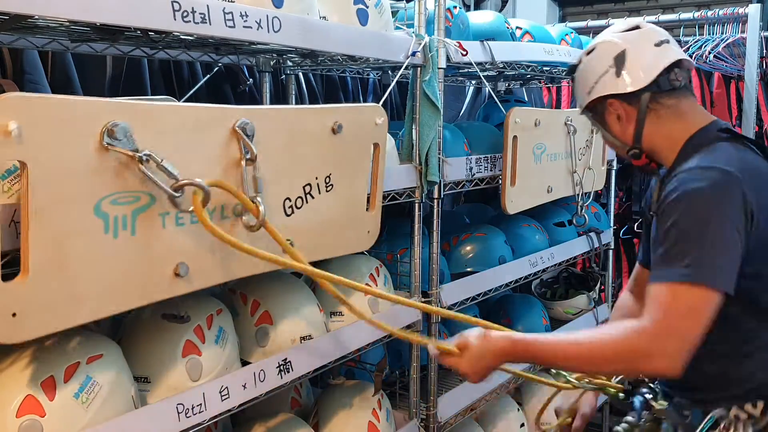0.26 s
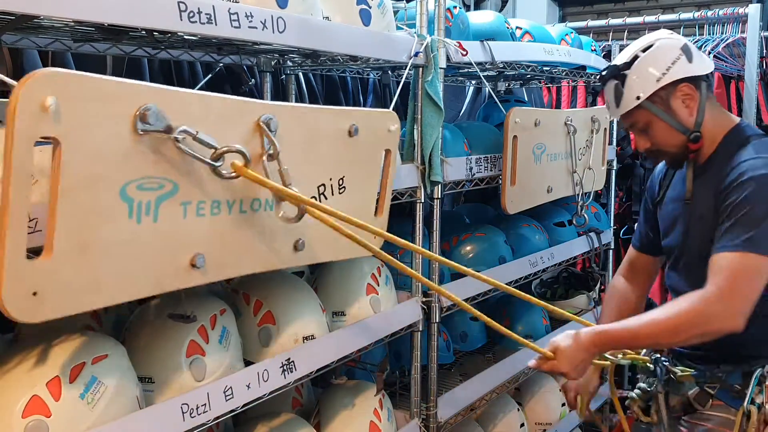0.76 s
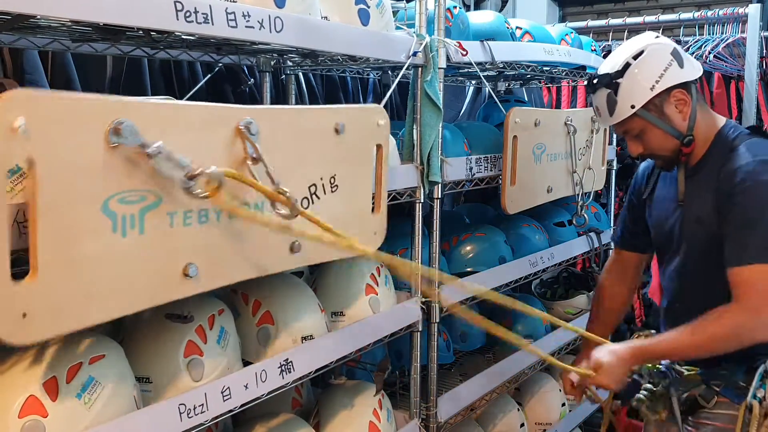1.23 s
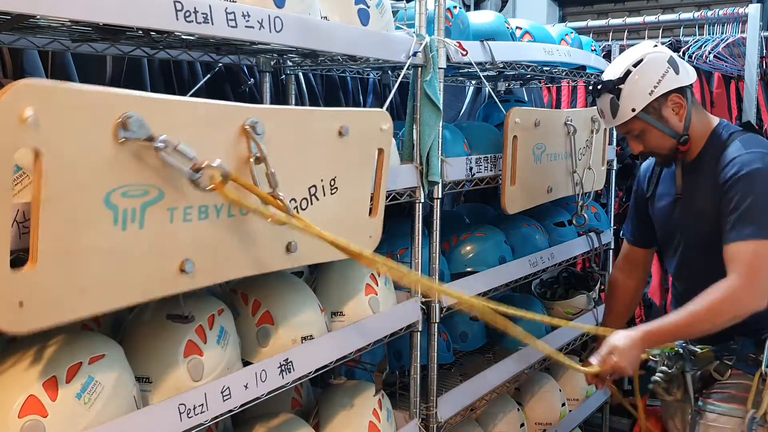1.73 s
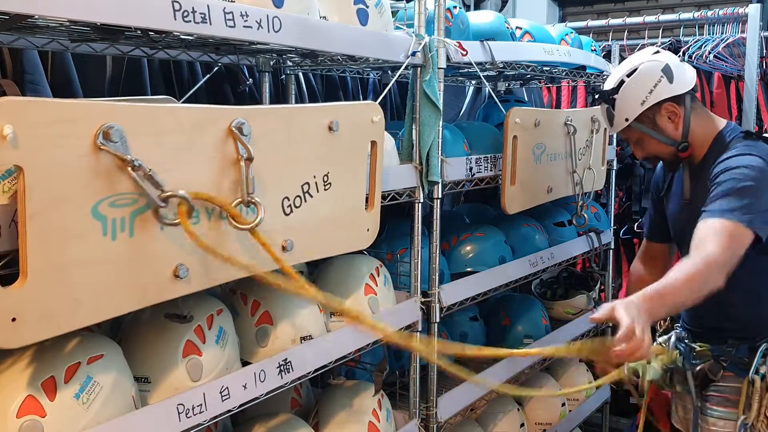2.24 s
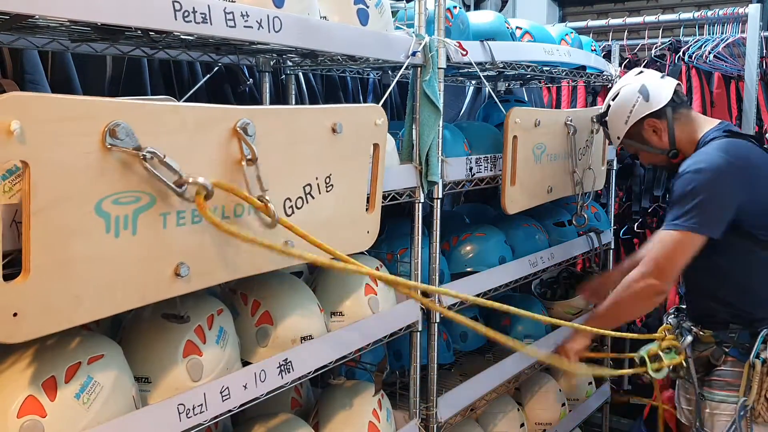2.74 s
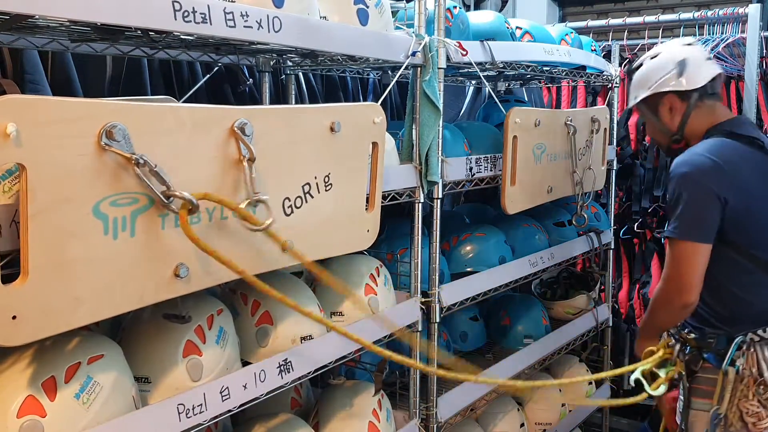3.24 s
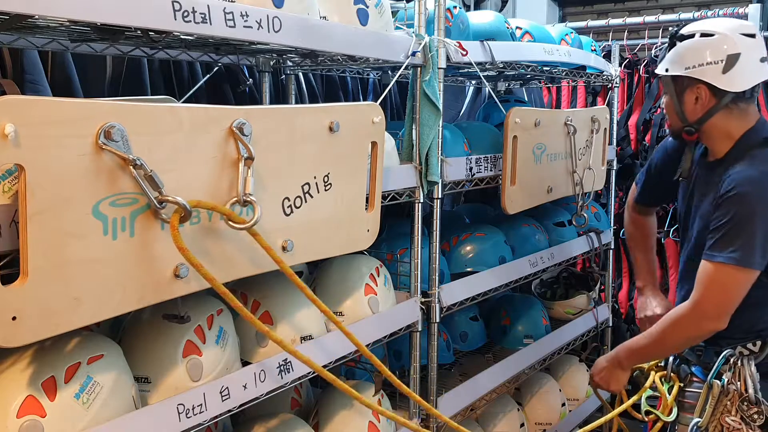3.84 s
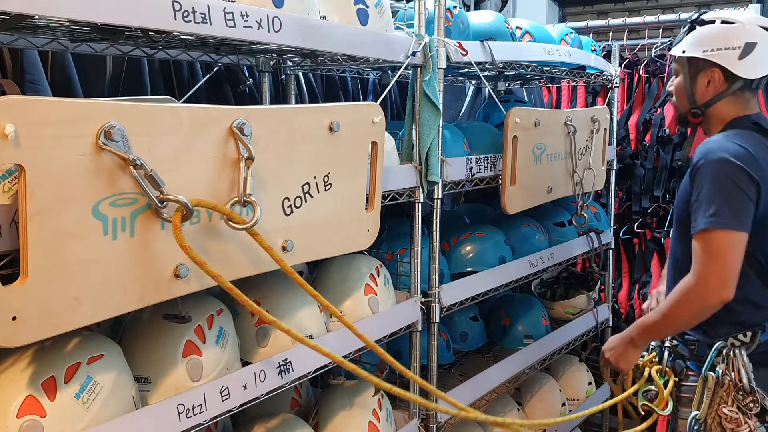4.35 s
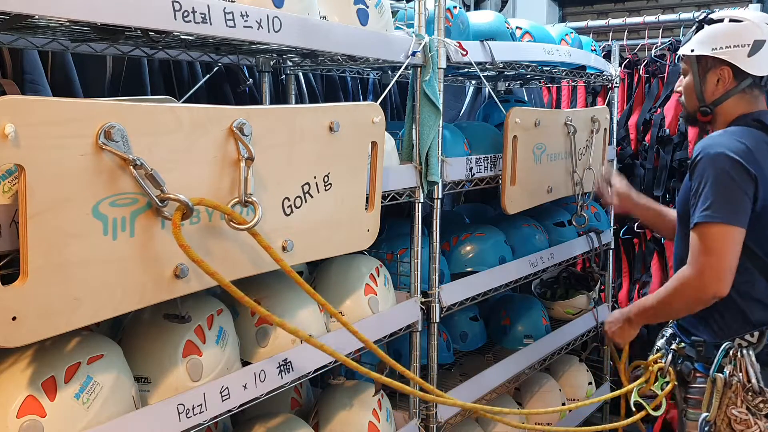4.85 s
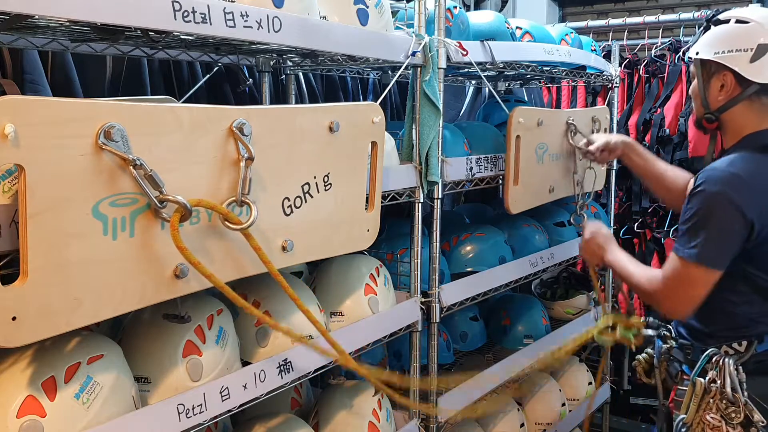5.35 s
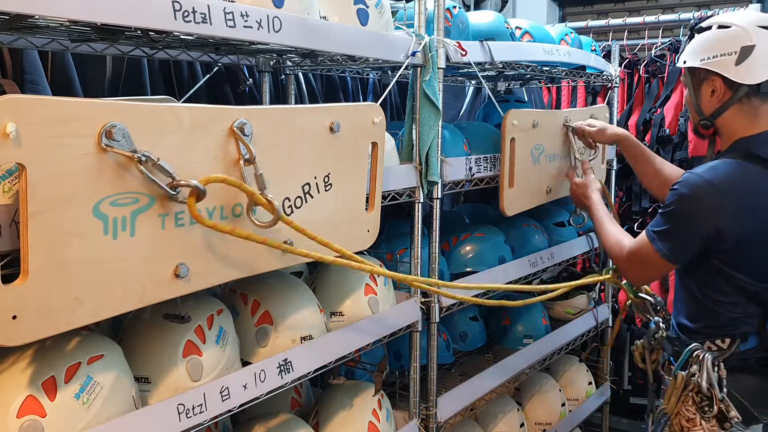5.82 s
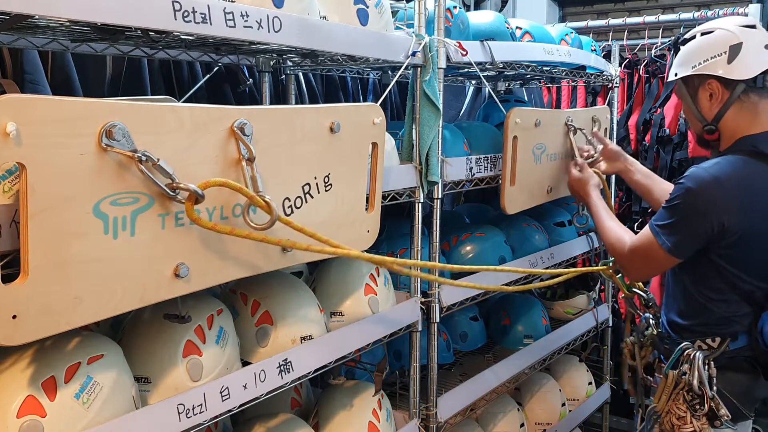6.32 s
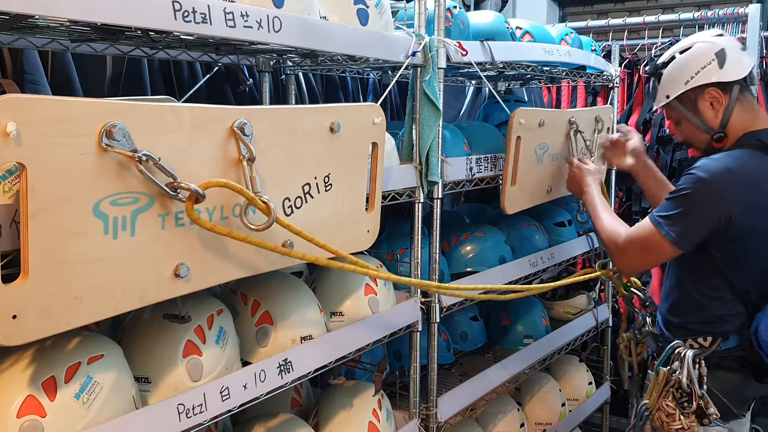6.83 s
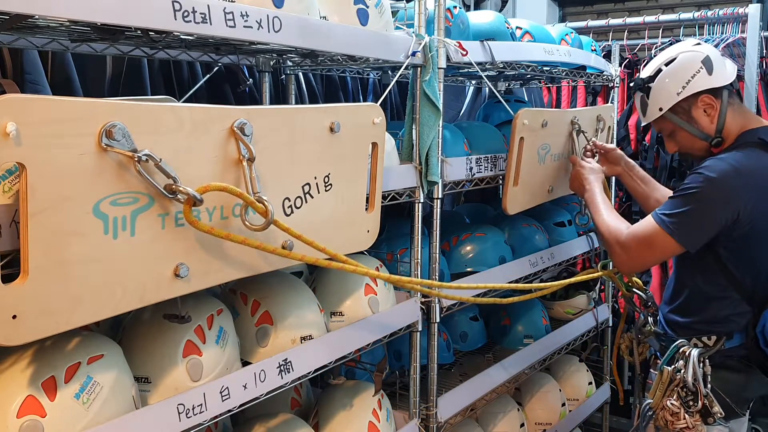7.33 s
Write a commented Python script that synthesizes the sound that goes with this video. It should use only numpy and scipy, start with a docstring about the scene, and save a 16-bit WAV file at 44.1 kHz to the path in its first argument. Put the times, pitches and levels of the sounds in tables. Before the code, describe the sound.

A low ventilation hum lies under soft rope rubbing, and a dry steel snap comes from the right almost at once. From about 0.5 seconds the rope is pulled in quick strokes through steel rings, with grainy link crunches and high pings. The strongest hollow plywood knocks fall near 1.0, 2.0, 2.6 and 3.0 seconds, with others near 1.1, 1.4 and 3.4, each with a dull thud of the rack. From 3 to 5 seconds slack hardware taps the board softly while harness gear jangles; a bright steel chime rings at 4.6. At 5.1 to 5.8 a chain clatters sharply on a second board, farther right. Finger friction, small clicks and faint carabiner pings follow, with firmer clacks near 6.6 and 7.05, then fading to quiet hum. The room answers with short, dense echoes.

```python
"""A low ventilation hum and a softly rubbing rope are heard first, then a dry snap of steel off to the right.
The rope is tugged through steel rings that hang by carabiners from a plywood board in a gear room:
the board knocks in decaying modes, the rings ping, links crunch and gear clicks on a harness.
Then a chain and a carabiner are handled on a second board, further off to the right.
Levels in the tables are relative; scene() sets the gain and place of each layer."""
import sys
import numpy as np
from scipy import signal
from scipy.fft import rfft, irfft
from scipy.io import wavfile
from scipy.ndimage import uniform_filter1d

SR = 44100
rng = np.random.default_rng(int(sys.argv[2]) if len(sys.argv) > 2 else 0)


def wav_out(sig):
    """Save sig, one row per channel (or a flat mono array), as 16-bit PCM at SR to the path in sys.argv[1]."""
    wavfile.write(sys.argv[1], SR, np.round(np.clip(np.atleast_2d(sig).T, -1, 1) * 32767).astype(np.int16))


N = 334266
TIME = np.arange(N) / SR
AGE = np.arange(SR * 3 // 4) / SR  # seconds since a blow

# hardware snaps taut on the near board: start_s, level_db, hardness_db (part above 1.4 kHz)
TUG_BLOWS = [(0.548, -27, -10.5), (0.755, -32, -4), (0.868, -29.5, -6.5), (0.986, -8, -13.5),
             (1.089, -16, -14), (1.422, -12, -8.5), (1.443, -26.5, 2), (1.467, -15, -19), (1.722, -32, 0),
             (1.969, -9.5, -7), (2.42, -36.5, -4.5), (2.548, -29, -1), (2.569, -8, -13.5),
             (2.646, -21, -11.5), (2.846, -28, -4), (3.011, -10, -15), (3.066, -26.5, -10),
             (3.392, -14.5, -15.5)]
# the chain clatters on the far board: start_s, level_db, hardness_db (part above 1.4 kHz)
CHAIN_BLOWS = [(5.09, -19, -5), (5.106, -17.5, 3), (5.202, -14.5, 0.5), (5.211, -16, 7.5),
               (5.416, -27, -1.5), (5.441, -23, 0), (5.488, -22.5, -1.5), (5.503, -17.5, 0),
               (5.563, -26.5, 4.5), (5.687, -25, 0), (5.756, -26.5, 4.5), (5.819, -21, -1.5)]
# strong modes of the far board: pitch_hz, level_db, t60_s
FAR_BOARD_MODES = [(636.5, -2.5, 0.09), (778, -10, 0.11), (1352, -1.5, 0.076), (1524, 9.5, 0.057),
                   (1560, 11.5, 0.029), (1872, 15, 0.02), (2016, 11, 0.026), (2094, -11, 0.017)]
# dense, quickly dying modes of the near board: frequency_hz, level_db (per Hz)
NEAR_BODY_SPECTRUM = [(200, -15.5), (400, -5.5), (620, 1), (820, -2.5), (1250, -4), (1600, -4),
                      (2100, -5.5), (3500, -12.5), (5500, -25.5), (16000, -57)]
# dense, quickly dying modes of the far board: frequency_hz, level_db (per Hz)
FAR_BODY_SPECTRUM = [(160, -65), (290, -4), (400, -3.5), (650, -4), (1000, -6.5), (1450, 4.5), (2300, -1),
                     (4200, -8.5), (7000, -21), (16000, -32)]
# steel on steel: frequency_hz, level_db (per Hz)
STEEL_SPECTRUM = [(300, -6), (1500, -3), (2800, 5), (4000, 9.5), (7000, 9.5), (10000, 1), (13800, -1),
                  (16000, -27.5)]


def amp(db):
    """Decibels to gain."""
    return 10 ** (np.asarray(db) / 20)


def read(points, hz):
    """A table read on a log-frequency axis."""
    f, value = np.transpose(points)
    return np.interp(np.log(hz + 1), np.log(f + 1), value)


def evened(x):
    """Scaled to rms 1."""
    return x / np.sqrt(np.mean(x ** 2) + 1e-20)


def peaked(x, size=130):
    """Scaled so that its loudest 3 ms have rms 1."""
    power = (x ** 2).mean(0)
    return x / np.sqrt(uniform_filter1d(power, size).max() + 1e-20)


def add(mix, s, sound):
    """Mixes a stereo sound in at time s."""
    part = mix[:, max(round(s * SR), 0):][:, :sound.shape[1]]
    part += sound[:, :part.shape[1]]


def noise(spectrum, size, spread_hz, slope_db=0, patchy_db=0):
    """Coloured noise at two microphones, unrelated above spread_hz, with chance peaks some 150 Hz wide."""
    hz = np.fft.rfftfreq(size, 1 / SR)
    shared, *own = rfft(rng.standard_normal((3, size)))
    same = 1 / (1 + (hz / spread_hz) ** 2)
    z = np.sqrt(same) * shared + np.sqrt(1 - same) * np.array(own)
    knots = np.arange(0, SR, 150)
    patches = np.interp(hz, knots, rng.standard_normal(len(knots)))
    octaves = np.log2(np.maximum(hz / 2000, 1))  # the slope acts above 2 kHz
    colour_db = read(spectrum, hz) + slope_db * octaves + patchy_db * patches
    return evened(irfft(z * amp(colour_db), size))


def dying(t60):
    """Exponential decay by 60 dB in t60 seconds."""
    return 10 ** (-3 * AGE / max(t60, .004))


def contacts(per_s):
    """One full contact, then smaller ones at chance moments."""
    train = (rng.random(len(AGE)) < per_s / SR) * rng.random(len(AGE))
    train[0] = 1
    return train


def flurry(per_s, wash):
    """Envelope of a rattle among neighbouring links, over a steady wash."""
    power = signal.fftconvolve(contacts(per_s), dying(0.029) ** 2)[:len(AGE)]
    return np.sqrt(abs(power + wash ** 2))


def ring(modes, struck_hz=0, boost_db=0, scatter_db=1, detune=0, sharp=0):
    """Decaying modes, a little different at each blow; those near struck_hz sound louder.
    Under load they start sharp by the given share and settle."""
    settle_s = 0.0085  # a tug stiffens the loaded hardware for about this long
    clock = AGE + sharp * settle_s * (1 - np.exp(-AGE / settle_s))
    out = 0
    for (hz, db, t60), (a, b, side) in zip(modes, rng.standard_normal((len(modes), 3))):
        nearness = np.exp(-((hz - struck_hz) / 500) ** 2)
        level = np.sign(side) * amp(db + scatter_db * a + boost_db * nearness)
        phase = (2 * np.pi * hz * (1 + detune * b) * clock).astype(np.float32)
        out = out + level * dying(t60) * np.sin(phase)
    return peaked(np.array([out, out]))


def board(rows, modes, body, body_db, body_t60, rattle_per_s, lowest_hz, sharp=0):
    """Blows on plywood: a few strong modes and a dense short rattle; harder blows are brighter."""
    out = np.zeros((2, N))
    lows = signal.butter(4, (lowest_hz, 1500), "bandpass", fs=SR, output="sos")
    highs = signal.butter(8, 1400, "highpass", fs=SR, output="sos")
    contact = np.sin(np.pi / 2 * np.minimum(AGE / .0008, 1)) ** 2  # onset within 0.8 ms
    for s, db, hardness_db in rows:
        rattle = noise(body, len(AGE), 1900, patchy_db=3.5) * flurry(rattle_per_s, wash=0.79)
        clack = peaked(rattle * dying(body_t60))
        tone = ring(modes, scatter_db=1.14, detune=0.006, sharp=sharp)
        blow = contact * (tone + amp(body_db) * clack)
        low = peaked(signal.sosfilt(lows, blow))
        high = evened(signal.sosfilt(highs, blow))
        add(out, s, amp(db) * (low + amp(hardness_db) * low.std() * high))
    return out


def pings(rows, modes, boost_db, chatter_per_s, chatter_t60):
    """Solid steel rings in a set of modes; chattering contacts restart them and roughen the tone."""
    out = np.zeros((2, N))
    for s, db, hz in rows:
        chatter = contacts(chatter_per_s) * dying(chatter_t60)
        tone = signal.fftconvolve(ring(modes, hz, boost_db), chatter[None], axes=1)
        add(out, s, amp(db) * peaked(tone))
    return out


def strokes(rows, rise_s, t60):
    """Speed of a hand over time: each stroke rises, holds for its length and dies away."""
    speed = np.zeros(N)
    for s, length, db in rows:
        rise = np.clip((TIME - s) / rise_s, 0, 1)
        coasting = np.maximum(TIME - s - length, 0)
        speed = np.maximum(speed, rise * amp(db) * np.exp(-np.log(1000) * coasting / t60))
    return speed


def rub(speed, spectrum, grain_db, count=4):
    """Friction at several spots, each with its own resonances, catching and slipping in turn."""
    spots = 0
    for _ in range(count):
        catches = evened(uniform_filter1d(rng.standard_normal(N), size=500))
        spots = spots + noise(spectrum, N, 2000, patchy_db=4.5) * amp(grain_db * catches)
    return evened(spots) * speed


def link_ticks(speed, per_s, uneven_db, t60, slope_db, count=6):
    """Links shift against each other during movement: a few spots, each ticking at chance moments."""
    out = 0
    for _ in range(count):
        moments = rng.random(N) < per_s / count / SR
        train = moments * amp(uneven_db * np.minimum(rng.exponential(1, N), 3)) * speed
        tick = peaked(noise(FAR_BODY_SPECTRUM, len(AGE), 2100, slope_db, patchy_db=4.5) * dying(t60))
        out = out + signal.oaconvolve(train[None], tick, axes=1)[:, :N]
    return out


def placed(x, count, left_db):
    """Direction: the right microphone hears the sound count samples later and left_db softer."""
    return np.array([x[0] * amp(left_db / 2), np.roll(x[1], count) * amp(-left_db / 2)])


def thinned(x, centre_hz, sharpness):
    """Thins a narrow band around centre_hz in the sound sent to the room, so the echoes ring less there."""
    return signal.lfilter(*signal.iirnotch(centre_hz, sharpness, fs=SR), x)


def ventilation(air_db, hum_db, hum_hz):
    """Dull air noise and a wavering fan hum."""
    # moving air: frequency_hz, level_db (per Hz)
    air_spectrum = [(20, -43.5), (45, -3), (62, 8), (80, -3), (160, -12), (300, -20), (600, -18),
                    (1500, -24), (4000, -35.5), (9000, -44), (16000, -63)]
    waver = evened(noise([(1, 0), (5, 0), (14, -60), (100, -160)], N, 1000)[0])
    hum = np.sqrt(2) * np.sin(2 * np.pi * hum_hz * TIME + 0.25 * waver)
    return amp(air_db) * noise(air_spectrum, N, 550) + amp(hum_db) * hum


def room(x, early_db, early_t60):
    """Shelves scatter a quick cloud of echoes; the room's tail follows, each band at its own speed."""
    # room decay: frequency_hz, t60_s
    room_decay = [(150, 0.76), (600, 0.44), (2000, 0.41), (6000, 0.28), (14000, 0.3)]
    cloud = noise([(20, 0), (20000, 0)], len(AGE), 900)
    hz, t, z = signal.stft(cloud, SR, nperseg=256)
    fade = 10 ** (-3 * t / read(room_decay, hz)[:, None])
    tail = signal.istft(z * fade, SR, nperseg=256)[1][:, :len(AGE)]
    tail = tail + amp(early_db) * cloud * dying(early_t60)
    tail = tail * np.clip(AGE / 0.002 - .5, 0, 1)  # echoes come in between 1 and 3 ms
    return signal.fftconvolve(x, tail / np.linalg.norm(tail[0]), axes=1)[:, :N]


def finger_handling():
    """Fingers work the chain and the carabiner against the far board: friction and ticking links."""
    # strokes of the fingers: start_s, length_s, level_db
    grip_strokes = [(5.21, 0.08, -45), (5.38, 0.33, -51.5), (5.74, 0.087, -38.5), (6.17, 0.15, -46.5),
                    (6.88, 0.21, -46.5)]
    grip = strokes(grip_strokes, rise_s=0.0075, t60=0.086)
    friction = rub(grip, FAR_BODY_SPECTRUM, grain_db=5.0)
    ticks = link_ticks(grip, per_s=120, uneven_db=3, t60=0.03, slope_db=7.5)
    return amp(1.5) * friction + amp(-3.5) * ticks


def carabiner_pings():
    """The far carabiner rings in its steel modes."""
    # blows on it: start_s, level_db, struck_hz (where the blow excites most)
    carabiner_blows = [(5.4869, -30, 7800), (5.7114, -35, 10900), (5.8257, -32, 7650), (6.124, -40, 6940),
                       (7.0339, -36, 7340)]
    # its modes: pitch_hz, level_db, t60_s
    carabiner_modes = [(7000, -3, 0.49), (7270, -5, 0.12), (7300, 6.5, 0.13), (10100, 2, 0.31),
                       (10260, 2.5, 0.37), (10700, -4, 0.16), (11250, -3, 0.41), (12400, 4, 0.13)]
    return pings(carabiner_blows, carabiner_modes, boost_db=5.5, chatter_per_s=71, chatter_t60=0.17)


def carabiner_clacks():
    """The carabiner knocks against its anchor and sets off the far board's modes."""
    # knocks: start_s, level_db, hardness_db (part above 1.4 kHz)
    anchor_knocks = [(5.316, -28, 0.5), (5.325, -32.5, -7), (5.914, -30.5, -9), (5.926, -33.5, 0.5),
                     (6.009, -38, 0), (6.344, -37, -3), (6.576, -25, 1), (6.703, -38.5, -0.5),
                     (6.827, -38, -2), (7.05, -20.5, -1.5), (7.316, -36.5, 1)]
    return board(anchor_knocks, FAR_BOARD_MODES, FAR_BODY_SPECTRUM, body_db=-9.5, body_t60=0.21,
                 rattle_per_s=12, lowest_hz=470)


def chain_clatter():
    """The chain strikes the far board, with many rattling contacts per blow."""
    return board(CHAIN_BLOWS, FAR_BOARD_MODES, FAR_BODY_SPECTRUM, body_db=10, body_t60=0.12,
                 rattle_per_s=120, lowest_hz=249)


def jangles(per_s, wash):
    """Dying flurries of contacts, each bunch of steel with resonances of its own."""
    # bunches of gear and chain links: start_s, level_db, treble_slope_db (per octave), t60_s
    bunches = [(2.961, -24.5, 3, 0.18), (3.497, -27.5, 0, 0.53), (3.551, -22, 4, 0.33),
               (3.8886, -31.5, 9, 0.2), (3.951, -22, 5.5, 0.15), (4.198, -28.5, 4, 0.59),
               (4.2259, -37.5, -3, 0.81), (4.487, -24.5, 3, 0.29), (4.598, -31.5, -0.5, 1),
               (4.626, -22, -3, 0.29), (5.1055, -20, -0.5, 0.35), (5.2, -16, 1, 0.35),
               (5.3452, -17.5, 6, 0.46)]
    out = np.zeros((2, N))
    for s, db, slope_db, t60 in bunches:
        steel = noise(STEEL_SPECTRUM, len(AGE), 4000, slope_db, patchy_db=4)
        add(out, s, amp(db) * peaked(steel * flurry(per_s, wash) * dying(t60)))
    return out


def snaps(t60):
    """Single contacts of gripped steel, damped within milliseconds: alone, or leading a blow of the chain."""
    # dry snaps of steel on steel: start_s, level_db, treble_slope_db (per octave)
    lone_snaps = [(0.0616, -23.5, -2), (0.4863, -22.5, 1), (0.611, -23, 2), (1.3403, -28.5, 1),
                  (1.5964, -31.5, 2), (2.3392, -29, 2), (2.61, -27, 8), (3.0864, -23, -3.5),
                  (3.265, -29.5, -9.5), (5.335, -18.5, 20), (5.928, -30.5, -4), (6.127, -31, -3.5),
                  (6.6305, -35, 9), (6.701, -32.5, 9), (6.839, -35, 3), (6.88, -37, 6)]
    # each blow of the chain starts with a snap of its links, 9 dB softer and sloping -3.5 dB per octave
    link_snaps = [(s, db - 9, -3.5) for s, db, _ in CHAIN_BLOWS]
    out = np.zeros((2, N))
    for s, db, slope_db in lone_snaps + link_snaps:
        steel = noise(STEEL_SPECTRUM, len(AGE), 7900, slope_db, patchy_db=6.5)
        add(out, s, amp(db) * peaked(steel * dying(t60)))
    return out


def rope_speed():
    """Pulls stand out of the slow creep of the slack rope; after each the rope coasts to a stop."""
    # each pull draws a length of rope through the rings: start_s, length_s, level_db
    pulls = [(0.28, 0.06, -43), (0.495, 0.028, -34), (0.62, 0.11, -33.5), (0.83, 0.013, -37.5),
             (0.94, 0.12, -43), (1.28, 0.052, -40.5), (2.76, 0.033, -47.5)]
    # between pulls the slack rope creeps until it is let go: time_s, level_db
    creep_points = [(0, -48.5), (1.3, -44.5), (2.1, -50.5), (3.35, -56.5), (3.6, -56)]
    creep = amp(np.interp(TIME, *np.transpose(creep_points), right=-120))
    return np.hypot(creep, strokes(pulls, rise_s=0.013, t60=1))


def running_rope():
    """The rope rubs through the rings, and the loaded links tick while it runs."""
    # rope friction: frequency_hz, level_db (per Hz)
    rope_spectrum = [(100, -27.5), (300, -8.5), (560, 6), (1000, -8.5), (1110, 12.5), (1230, -5),
                     (2200, 0.5), (4000, -4), (7000, -12.5), (15000, -24)]
    pull = rope_speed()
    friction = rub(pull, rope_spectrum, grain_db=4.5)
    ticks = link_ticks(pull, per_s=97, uneven_db=7.5, t60=0.055, slope_db=-9.5)
    return amp(4.0) * friction + amp(-16.5) * ticks


def crunches(per_s, wash, t60):
    """Loaded links jerk into a new seat as the rope drags them: a short, grainy burst of contacts."""
    # crunches: start_s, level_db
    crunch_rows = [(0.503, -31), (0.545, -24), (0.612, -22), (0.646, -21.5), (0.695, -26), (0.752, -25),
                   (1.306, -33), (1.393, -27.5), (1.724, -26), (2.605, -22), (3.03, -27.5)]
    # crunching links: frequency_hz, level_db (per Hz)
    link_spectrum = [(200, -10.5), (480, -5), (1400, 2.5), (3600, 2), (6000, -15.5), (16000, -45)]
    out = np.zeros((2, N))
    for s, db in crunch_rows:
        links = noise(link_spectrum, len(AGE), 2000, patchy_db=4)
        add(out, s, amp(db) * peaked(links * flurry(per_s, wash) * dying(t60)))
    return out


def bumps():
    """Single resonances of the rack and its gear, each driven by a short uneven push."""
    # resonances: start_s, level_db, pitch_hz, t60_s, push_t60_s
    bump_rows = [(0.456, -23, 294, 0.047, 0.12), (0.158, -32.5, 474, 0.2, 0.55),
                 (0.6, -36, 5900, 0.14, 0.065), (1.039, -29.5, 120, 0.091, .15),
                 (3.951, -24, 3460, .02, 0.18)]
    out = np.zeros((2, N))
    for s, db, hz, t60, push_t60 in bump_rows:
        push = contacts(500) * dying(push_t60)
        tone = signal.fftconvolve(ring([(hz, 0, t60)]), push[None], axes=1)
        add(out, s, amp(db) * peaked(tone))
    return out


def hanging_chime():
    """A free-hanging steel piece chimes, roughened by dense chatter."""
    # blows on it: start_s, level_db, struck_hz (where the blow excites most)
    chime_blows = [(0.3042, -35.5, 7140), (2.3396, -57, 7200), (4.6274, -18.5, 9490), (4.6444, -22, 8800)]
    # its modes: pitch_hz, level_db, t60_s
    chime_modes = [(2360, -10, 0.21), (3880, -8.5, 0.1), (5480, -3.5, 0.09), (5430, -11, 0.11),
                   (6255, -21, 0.2), (7160, -2.5, 0.13), (8037, -13, 0.22), (9165, -4.5, 0.072),
                   (13500, -14, 0.13), (14525, -14, .24), (15340, -15, .22)]
    return pings(chime_blows, chime_modes, boost_db=14, chatter_per_s=990, chatter_t60=0.17)


def ring_pings():
    """The steel rings ping in two high modes."""
    # blows on them: start_s, level_db, struck_hz (where the blow excites most)
    ring_blows = [(0.5482, -35, 10300), (0.609, -22.5, 10100), (0.6268, -18.5, 10750),
                  (0.7999, -31.5, 10200), (1.3932, -24, 11000), (1.722, -36.5, 10730),
                  (1.8547, -39.5, 10750), (2.55, -44, 10800), (3.0325, -28.5, 10900)]
    # their modes: pitch_hz, level_db, t60_s
    ring_modes = [(10198, 0, 0.22), (11180, 0.013, 0.16)]
    return pings(ring_blows, ring_modes, boost_db=10.5, chatter_per_s=100, chatter_t60=0.28)


def slack_taps():
    """The slack hardware swings back and taps the near board."""
    # taps: start_s, level_db, hardness_db (part above 1.4 kHz)
    tap_blows = [(0.454, -35.5, -18.5), (3.328, -22.5, -12), (3.728, -24, -13), (4.075, -27.5, -25),
                 (4.139, -30.5, -18), (4.756, -33.5, -26), (4.815, -38, -30)]
    # the near board with its hardware hanging slack: pitch_hz, level_db, t60_s
    slack_modes = [(318.7, -11.5, 0.12), (493, -3.5, 0.18), (588, 0.5, 0.11), (777, -9.5, 0.23),
                   (843, -4.5, 0.11), (1097, -2, 0.11)]
    return board(tap_blows, slack_modes, NEAR_BODY_SPECTRUM, body_db=-5, body_t60=0.15,
                 rattle_per_s=10, lowest_hz=280)


def thuds(below_db, t60):
    """The rack behind the board takes up each tug with a dull thud, in proportion to its strength."""
    # the shaken rack: frequency_hz, level_db (per Hz)
    rack_spectrum = [(50, -23.5), (110, -5.5), (260, -6), (340, -9), (1000, -74.5)]
    out = np.zeros((2, N))
    for s, db, _ in TUG_BLOWS:
        thud = peaked(noise(rack_spectrum, len(AGE), 980) * dying(t60))
        add(out, s, amp(db + below_db) * thud)
    return out


def tug_knocks():
    """Hardware snaps taut and knocks the near board, whose loaded modes start sharp and settle."""
    # the near board under load: pitch_hz (once settled), level_db, t60_s
    loaded_modes = [(443, -15.5, 0.17), (585, 1.5, 0.11), (920, -19, 0.13), (1099, 7.5, 0.12),
                    (1265, -11, 0.069), (1512, -8, 0.18), (1967, -13.5, 0.25)]
    return board(TUG_BLOWS, loaded_modes, NEAR_BODY_SPECTRUM, body_db=-8.5, body_t60=0.14,
                 rattle_per_s=37, lowest_hz=440, sharp=0.051)


def scene():
    """The near board, on the left, is mostly direct; the far board and the harness are mostly room."""
    air = ventilation(air_db=-47.5, hum_db=-55.5, hum_hz=59.3)

    chain = amp(-6) * chain_clatter()
    clacks = amp(2.5) * carabiner_clacks()
    carabiner = amp(-7) * carabiner_pings()
    gear = amp(-0.5) * snaps(t60=0.021) + amp(-4.0) * jangles(per_s=150, wash=0.2)
    far = chain + clacks + carabiner + gear

    chime = amp(-1) * hanging_chime()
    near = amp(1.5) * tug_knocks() + slack_taps() + amp(2.5) * ring_pings() + bumps()
    near = near + amp(1.5) * crunches(per_s=120, wash=.25, t60=.15) + thuds(below_db=-28.5, t60=0.25)

    direct = placed(near + running_rope(), count=5, left_db=0.2) + chime
    direct = direct + placed(far + finger_handling(), count=-4, left_db=-4.0)

    near_send = thinned(thinned(near, centre_hz=1095, sharpness=9.2), centre_hz=571, sharpness=9.7)
    far_send = chain + carabiner + gear + amp(0.5) * thinned(clacks, centre_hz=1740, sharpness=2.5)
    send = amp(-5.5) * near_send + amp(1.5) * far_send + amp(0.5) * chime
    return direct + room(send, early_db=3.0, early_t60=0.031) + air


def record(dry):
    """The band limit of the recorder: a steep low-pass at 16.2 kHz."""
    lowpass = signal.firwin(511, 16200, window=("kaiser", 9), fs=SR)
    return signal.oaconvolve(dry, lowpass[None], "same")


dry = scene()
out = record(dry)
wav_out(out)
```